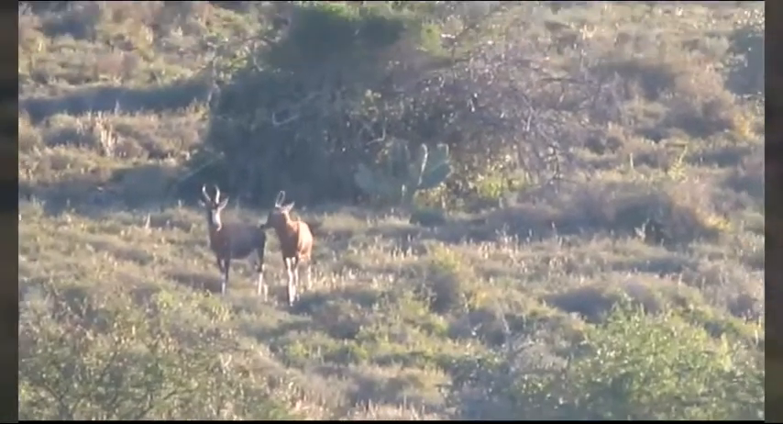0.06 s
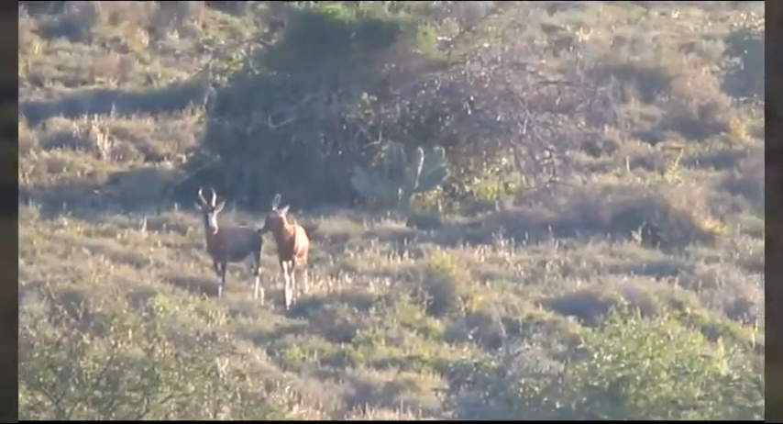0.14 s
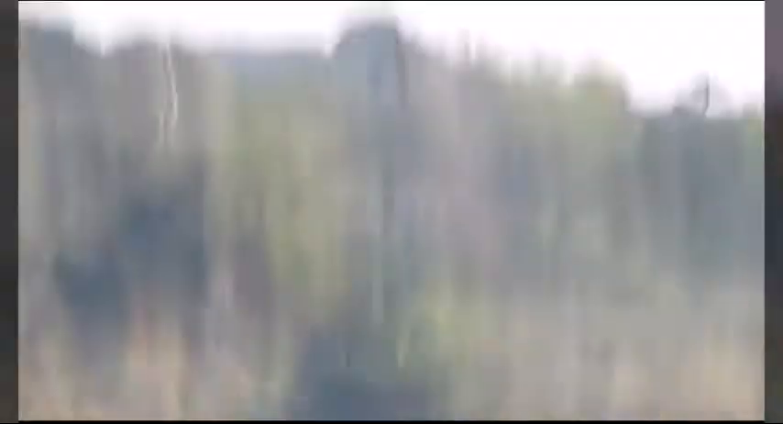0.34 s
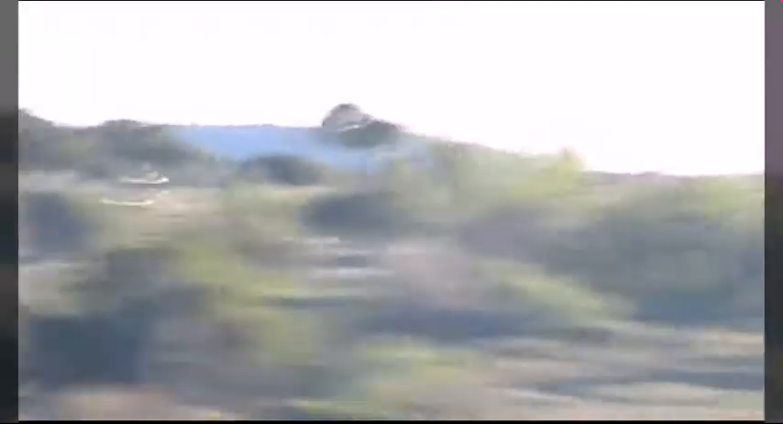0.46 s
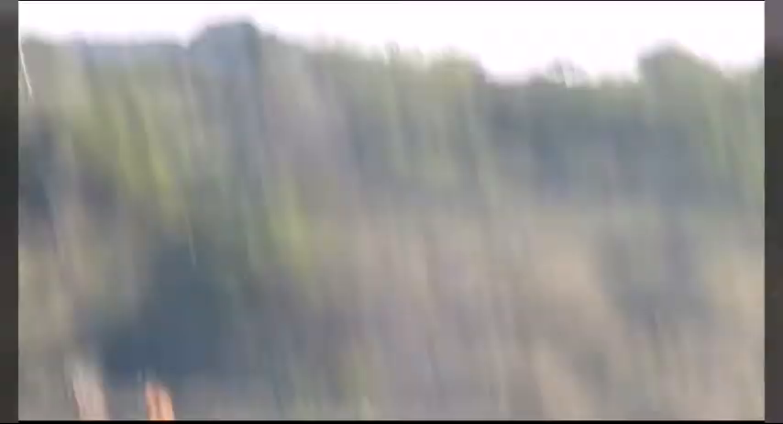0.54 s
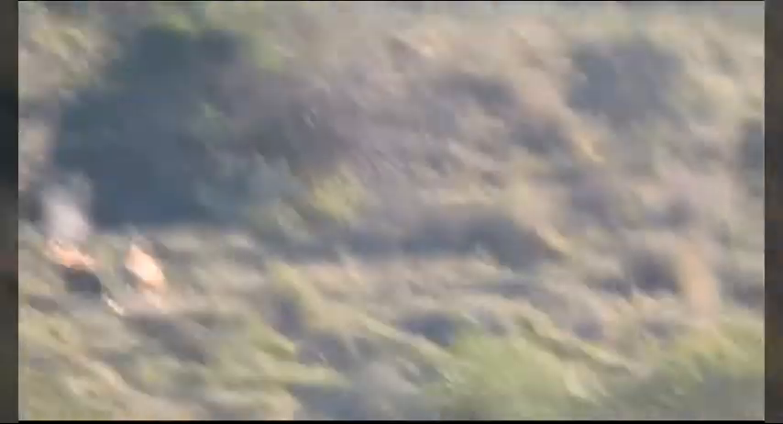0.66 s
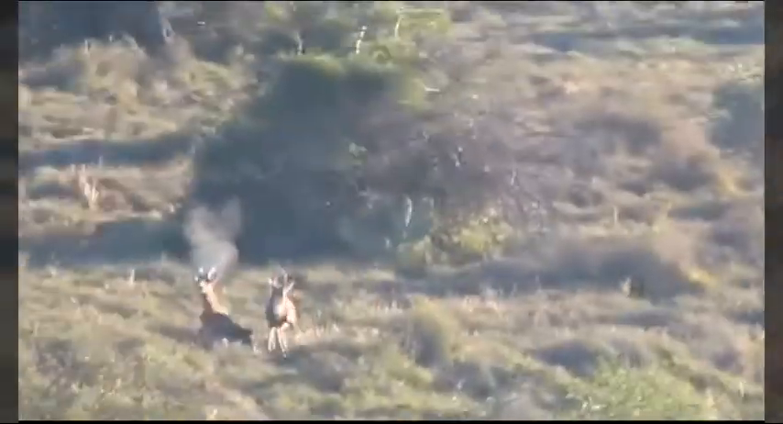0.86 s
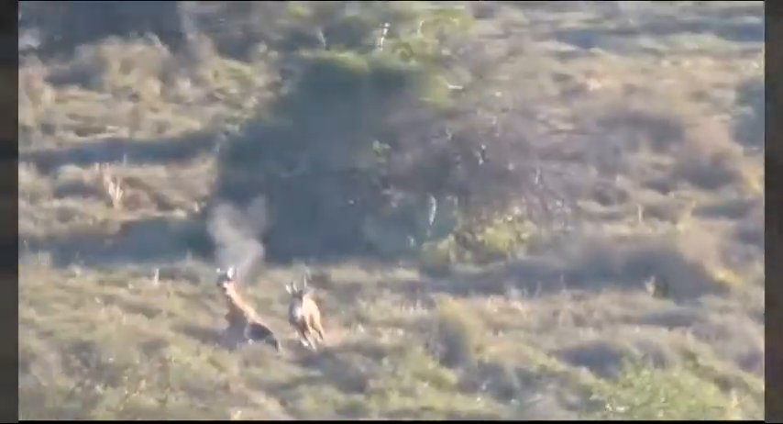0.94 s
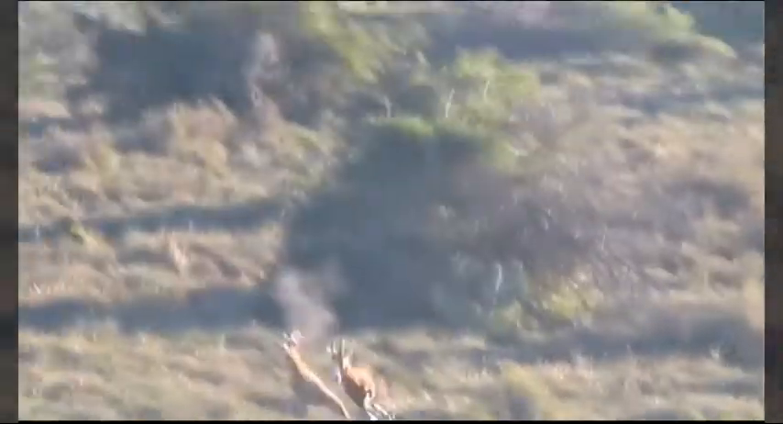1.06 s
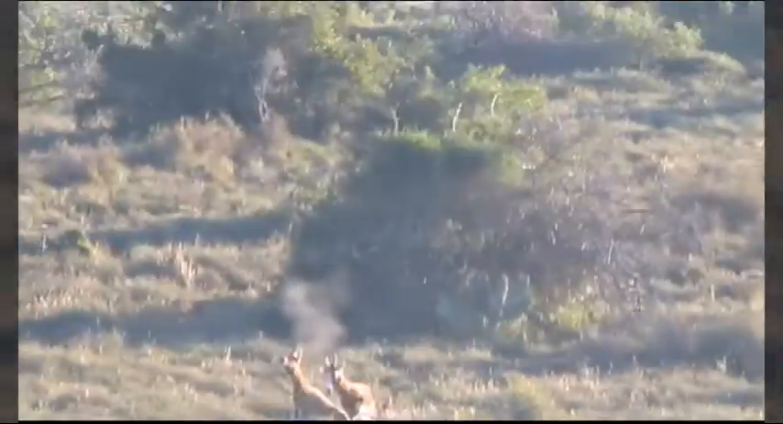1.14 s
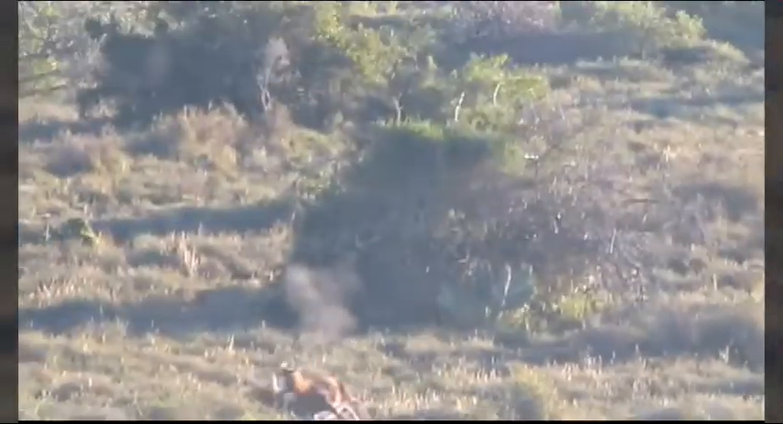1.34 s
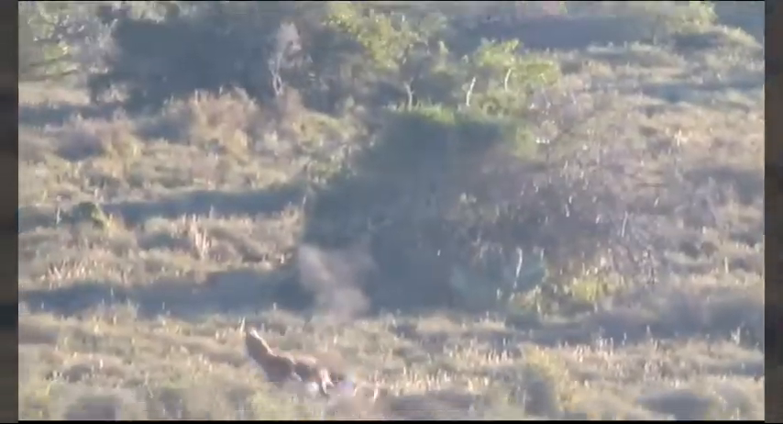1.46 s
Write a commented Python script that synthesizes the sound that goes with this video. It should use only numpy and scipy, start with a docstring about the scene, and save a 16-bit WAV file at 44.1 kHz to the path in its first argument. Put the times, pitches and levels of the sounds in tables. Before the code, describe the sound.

After a brief moment of faint breeze, a close rifle blast bursts out, crackles back from bushes and rumbles into the distance; almost a second later comes a short thudding smack, with dull fluttering echoes after it.

```python
"""Open bush country: a rifle fires beside a camera, a sharp noise front, pressure push and deep swing.
Noise dying by frequency is the scatter of the near scrub; short noise bursts are single bushes.
A sinking hiss and low roll come from ever farther away, then a dull return from the far slope.
The hit comes back as damped knocks, slap noise, a thud and a low tail, all over a light breeze.
The camera's gain control ducks under the shot and recovers slowly."""
import sys
import numpy as np
from scipy import signal
from scipy.fft import rfft, irfft, next_fast_len
from scipy.io import wavfile
from scipy.ndimage import map_coordinates

SR = 44100
rng = np.random.default_rng(int(sys.argv[2]) if len(sys.argv) > 2 else 0)


def wrap_up_sound(samples):
    """Save the sound to the file named by the first command line argument, as 16-bit audio."""
    columns = np.atleast_2d(samples).T
    # keep every value between -1 and 1, then stretch to whole-number steps
    tamed = np.clip(columns, -1, 1)
    steps = np.round(tamed * 32767).astype(np.int16)
    wavfile.write(sys.argv[1], SR, steps)


N = 66150
SHOT_S = 0.2445


def amp(db):
    """Amplitude factor of a level in dB."""
    return 10 ** (np.asarray(db) / 20)


def unit(x):
    """x scaled to rms 1 over all channels."""
    return x / np.sqrt(np.mean(x ** 2) + 1e-20)


def since(start_s):
    """Seconds since start_s for every sample."""
    return np.arange(N) / SR - start_s


def along(points, hz):
    """Value at hz, interpolated on a log frequency axis."""
    point_hz, value = np.transpose(points)
    return np.interp(np.log(hz + 1), np.log(point_hz + 1), value)


def level(points):
    """Gain along (time [s], level [dB]) points."""
    return amp(np.interp(since(0), *np.transpose(points)))


def wobble(rate):
    """Smooth random curve, rate knots per second."""
    knots = rng.standard_normal(4096)
    return map_coordinates(knots, [np.arange(N) * rate / SR], mode="wrap")


def filtered(x, response):
    """x through a fixed frequency response."""
    size = next_fast_len(N + 8192)
    hz = np.fft.rfftfreq(size, 1 / SR)
    return irfft(rfft(x, size) * response(hz), size)[..., :N]


def shaped(x, gain_db, size):
    """x under a gain that depends on frequency and time."""
    hz, t, bins = signal.stft(x, SR, nperseg=size)
    bins = bins * amp(gain_db(hz[:, None], t))
    return signal.istft(bins, SR, nperseg=size)[1][:, :N]


def noise(spectrum):
    """Two unrelated coloured noises, joint rms 1."""
    return unit(filtered(rng.standard_normal((2, N)), lambda hz: amp(along(spectrum, hz))))


def sinking(spectrum, octaves_per_s):
    """Noise whose spectrum slides down as the path over grass and through air grows."""
    def slide_db(hz, t):
        return along(spectrum, hz * 2 ** (octaves_per_s * (t - SHOT_S)))
    return unit(shaped(rng.standard_normal((2, N)), slide_db, size=1024))


def spread(pair, side_db):
    """Left and right from a middle signal and a side signal at side_db."""
    mid, side = pair[0], pair[1] * amp(side_db)
    return np.array([mid + side, mid - side]) / np.sqrt(1 + amp(2 * side_db))


def swing(center_s, hz, spread_s):
    """Swing of air pressure: a sine under a Gaussian centred on center_s."""
    t = since(center_s)
    return -np.sin(2 * np.pi * hz * t) * np.exp(-(t / spread_s) ** 2)


def swell(center_s, db, half_s, pan_db):
    """Left and right gain of one short echo, 4.3 dB down at half_s from its centre."""
    side_gains = amp([[db + pan_db / 2], [db - pan_db / 2]])
    return side_gains * np.exp(-np.abs(since(center_s) / half_s) ** 3 / 2)


AIR_DB = -50.5
# Breeze and microphone hiss: (frequency [Hz], relative density [dB per Hz])
AIR_SPECTRUM = [(20, 2), (45, -9.5), (100, -5), (200, -14), (400, -17.5), (950, -13.5), (1500, -27),
                (3000, -29.5), (8000, -34), (14000, -39.5)]


def air():
    """Light breeze over microphone hiss: coloured noise with a slow level wobble."""
    return spread(noise(AIR_SPECTRUM), side_db=-1.5) * amp(AIR_DB + 0.58 * wobble(rate=7))


# Far slope spectrum: (frequency [Hz], relative density [dB per Hz])
FAR_SPECTRUM = [(100, -15), (200, -6.5), (400, -10), (650, -15.5), (1000, -12.5), (1500, -1.5), (2300, 3),
                (3100, -1), (4300, -18), (6000, -19.5), (8000, -46.5), (11000, -79)]
# Dull return from the far slope: (time [s], level [dB])
FAR_LEVEL = [(.7, -57), (.95, -31), (1.15, -32), (1.22, -29), (1.3, -30.5), (1.395, -31.5), (1.5, -34)]
# Stronger returns: (time [s], level [dB], half length [s], left-right difference [dB])
FAR_RETURNS = [(1.181, -15, 0.0035, -1), (1.19, -21, 0.0042, 1), (1.205, -35, 0.0016, -2),
               (1.234, -24.5, 0.0062, 0), (1.265, -26.5, 0.004, 1), (1.301, -25.5, 0.0057, -1),
               (1.335, -25.5, 0.013, -0.5), (1.431, -28, 0.0088, -1), (1.477, -28, 0.0026, -0.5)]


def far_slope():
    """Dull, fluttering return of the blast; base and stronger returns add in power."""
    power = level(FAR_LEVEL) ** 2 + sum(swell(*row) ** 2 for row in FAR_RETURNS)
    flutter = amp(1.2 * wobble(rate=340))
    return spread(noise(FAR_SPECTRUM), side_db=-8.5) * flutter * np.sqrt(power) * (since(SHOT_S) >= 0)


ROLL_AT_100_MS_DB, ROLL_LOSS_DB_PER_DECADE = -19, 20  # loss per tenfold path
ROLL_SINK_OCT_PER_S, ROLL_FLUTTER_DB = 1.5, 2
# Low roll at the shot: (frequency [Hz], relative density [dB per Hz])
ROLL_SPECTRUM = [(30, -31), (110, -19.5), (210, 0.5), (330, 0), (540, -3.5), (780, -10), (1200, -26),
                 (3000, -56.5)]


def roll():
    """Bass of the report rolling on over the ground, weaker and deeper with the path."""
    t = since(SHOT_S)
    level_db = ROLL_AT_100_MS_DB - ROLL_LOSS_DB_PER_DECADE * np.log10(np.maximum(10 * t, 0.5))
    level_db = level_db + ROLL_FLUTTER_DB * wobble(rate=38)
    return spread(sinking(ROLL_SPECTRUM, ROLL_SINK_OCT_PER_S), side_db=-17) * amp(level_db) * (t >= 0)


TWIG_SIDE_DB, TWIG_NARROWS_DB_PER_S, TWIG_ROUGH_DB = -1, 10, 1.5


def twigs(pair):
    """Crackling scatter from many twigs, narrower as it comes from farther ahead."""
    side_db = TWIG_SIDE_DB - TWIG_NARROWS_DB_PER_S * since(SHOT_S)
    return unit(spread(pair, side_db) * amp(TWIG_ROUGH_DB * wobble(rate=450)))


HISS_SINK_OCT_PER_S, HISS_FLUTTER_DB = 0.62, 1.24
# Hiss at the shot: (frequency [Hz], relative density [dB per Hz])
HISS_SPECTRUM = [(500, -57.5), (1100, -26.5), (1700, -13.5), (2400, -5.5), (3500, 1), (4800, 0),
                 (6600, -5.5), (8800, -15), (11500, -21), (14500, -67)]
# Rolling hiss between the bushes: (time [s], level [dB])
HISS_LEVEL = [(.26, 4.5), (.39, -14.5), (.45, -18), (.515, -23), (.6, -19), (.69, -22), (.745, -16.5),
              (.9, -18.5), (1.0, -21), (1.155, -15), (1.211, -29.5), (1.5, -52)]


def hiss():
    """The crack comes back as a rolling hiss that dulls with distance."""
    scatter = twigs(sinking(HISS_SPECTRUM, HISS_SINK_OCT_PER_S))
    flutter = amp(HISS_FLUTTER_DB * wobble(rate=110))
    return scatter * level(HISS_LEVEL) * flutter * (since(SHOT_S) >= 0)


# Bush echo before its octave shift: (frequency [Hz], relative density [dB per Hz])
BUSH_SPECTRUM = [(500, -40), (1100, -22), (1700, -7.5), (2500, -1.5), (3600, 2), (5200, -0.5), (6800, -9),
                 (8800, -17.5), (11000, -27.5), (14000, -67.5)]
# Single bushes: (time [s], level [dB], half length [s], left-right difference [dB], shift [octaves])
BUSH_ECHOES = [(0.298, 11, 0.0052, 4.5, 0.22), (0.332, 6, 0.0043, 5.5, 0.015),
               (0.359, -1, 0.0042, -1.5, -0.2), (.386, -7.5, 0.0052, -2, -0.08),
               (.433, -11, 0.0045, 8, -.3), (0.47, -11, 0.0079, -3.5, 0), (.489, -11, 0.005, 1, 0.28),
               (0.547, -10, 0.0066, -3.5, 0.0059), (0.571, -14.5, 0.0076, -3, 0.014),
               (0.798, -18, 0.0049, 0, -0.1), (.843, -15.5, 0.0056, 2, -0.25),
               (.869, -15, 0.0055, 1.5, -0.14), (0.914, -14.5, 0.011, 0.5, -0.19),
               (0.976, -14, 0.0035, 0, -0.32), (1.024, -14, 0.0022, -1, -0.34),
               (1.1, -20, 0.0019, 5, -0.33), (1.12, -20.5, 0.0045, 0, -0.32)]


def bushes():
    """Each big bush throws the crack back as a short noise burst of its own brightness."""
    out = np.zeros((2, N))
    for time_s, db, half_s, pan_db, octaves in BUSH_ECHOES:
        colour = [(hz * 2 ** octaves, band_db) for hz, band_db in BUSH_SPECTRUM]
        out = out + twigs(noise(colour)) * swell(time_s, db, half_s, pan_db)
    return out


HIT_S, HIT_AIR_HZ = 1.16, 5300  # the long path takes the treble
# Ring of the strike: (frequency [Hz], level [dB], T60 [s])
KNOCK_MODES = [(313, -13.5, 0.029), (966, -14, 0.015), (1630, 4, 0.0059), (4240, -2, .005)]
SLAP_DB, SLAP_T60_S = -11, 0.022
# Slap: (frequency [Hz], relative density [dB per Hz])
SLAP_SPECTRUM = [(200, -20), (600, -20), (1000, -6), (1700, 8), (2600, 8), (5000, -20), (8000, -19),
                 (12000, -40)]
THUD_DELAY_S, THUD_DB, THUD_HZ, THUD_SPREAD_S = 0.00449, 1, 155.4, 0.0035
HIT_TAIL_DB, HIT_TAIL_T60_S = -16.5, 0.11
# Low tail: (frequency [Hz], relative density [dB per Hz])
HIT_TAIL_SPECTRUM = [(30, -3), (90, -6), (200, -8), (400, -15), (1000, -48), (4000, -52)]


def hit():
    """Bullet strike: damped cosines, decaying slap noise, a thud swing and a short low tail."""
    t = since(HIT_S)
    age_s = np.maximum(t, 0)
    knock = np.zeros(N)
    for hz, db, t60_s in KNOCK_MODES:
        knock = knock - np.cos(2 * np.pi * hz * age_s) * amp(db - 60 * age_s / t60_s)
    slap = spread(noise(SLAP_SPECTRUM), side_db=-6) * amp(SLAP_DB - 60 * age_s / SLAP_T60_S)
    thud = amp(THUD_DB) * swing(HIT_S + THUD_DELAY_S, THUD_HZ, THUD_SPREAD_S)
    tail = spread(noise(HIT_TAIL_SPECTRUM), side_db=-23)
    tail = tail * amp(HIT_TAIL_DB - 60 * age_s / HIT_TAIL_T60_S)
    strike = (knock + slap + thud + tail) * (t >= 0)
    return filtered(strike, lambda hz: np.exp(-(hz / HIT_AIR_HZ) ** 4))


SCRUB_DB, SCRUB_HOLD_S, SCRUB_SAG_DB_PER_S, SCRUB_ROUGH_DB = 16.5, 0.034, 77, 0.86
# Near scrub, also colours the front: (frequency [Hz], relative density [dB per Hz])
SCRUB_SPECTRUM = [(20, 0), (70, 4.5), (170, -3), (330, 0.5), (510, 5.5), (800, 3), (1000, 4), (1400, -3.5),
                  (2100, 3.5), (3200, -3.5), (5000, 1), (7000, 0.5), (10000, -2), (14000, -8),
                  (16000, -23.5)]
# Scrub decay after the hold: (frequency [Hz], T60 [s])
SCRUB_T60 = [(50, 0.092), (130, .13), (280, 0.3), (500, 0.27), (1100, 0.18), (3000, 0.21), (7000, 0.24),
             (14000, 0.19)]
# Left-right likeness: (frequency [Hz], correlation [-1..1])
SCRUB_ALIKE = [(60, -.1), (140, 0.5), (300, .65), (700, 0.91), (1500, 0.65), (3000, 0.15), (14000, 0.16)]


def scrub():
    """Dense scatter from the near scrub: holds with a slight sag, then dies at a rate per frequency."""
    def mid_side(hz):
        angle = np.arccos(np.clip(along(SCRUB_ALIKE, hz), -1, 1)) / 2
        return np.array([np.cos(angle), np.sin(angle)])

    def dying_db(hz, t):
        return -60 * np.maximum(t - SHOT_S - SCRUB_HOLD_S, 0) / along(SCRUB_T60, hz)

    t = since(SHOT_S)
    mid, side = filtered(noise(SCRUB_SPECTRUM), mid_side)
    scatter = shaped(unit(np.array([mid + side, mid - side])), dying_db, size=256)
    sag_db = SCRUB_SAG_DB_PER_S * np.clip(t, 0, SCRUB_HOLD_S)
    return scatter * amp(SCRUB_DB + SCRUB_ROUGH_DB * wobble(rate=420) - sag_db) * (t >= 0)


BOOM_S, BOOM_DB, BOOM_HZ, BOOM_SPREAD_S = 0.255, 2.5, 41.7, 0.009


def boom():
    """Deep swing of the muzzle blast, cut off before the shot."""
    return -amp(BOOM_DB) * swing(BOOM_S, BOOM_HZ, BOOM_SPREAD_S) * (since(SHOT_S) >= 0)


CRACK_DB, CRACK_HOLD_S, CRACK_FALL_DB_PER_S = 20, 0.0012, 5996.5
PUSH_DB, PUSH_S = 15, 0.0025


def muzzle_blast():
    """Sharp noise front plus a pressure push that reverses sign after PUSH_S."""
    t = since(SHOT_S)
    age_s = np.maximum(t, 0)
    fall_db = CRACK_FALL_DB_PER_S * np.maximum(t - CRACK_HOLD_S, 0)
    front = noise(SCRUB_SPECTRUM) * amp(CRACK_DB - fall_db)
    push = -amp(PUSH_DB) * (1 - age_s / PUSH_S) * np.exp(-age_s / PUSH_S)
    return (front + push) * (t >= 0)


def scene():
    """Everything that reaches the camera."""
    background = air() + far_slope() + roll()
    echoes = hiss() + bushes()
    return background + echoes + hit() + scrub() + boom() + muzzle_blast()


GAIN_LIMIT_DB, GAIN_ATTACK_S, GAIN_RECOVERY_DB_PER_S = -11, 0.007, 11.5
TOP_HZ = 15400
# Left microphone against right, half applied to each: (frequency [Hz], difference [dB])
MIC_DIFFERENCE = [(60, 0), (300, -0.5), (700, 1.5), (1600, -1.5), (3000, -1.5), (5500, 4.5), (8000, 2),
                  (12000, -1)]


def record(dry):
    """Gain control ducking fast and recovering slowly, unequal microphones, clipping, band limit."""
    keep = np.exp(-1 / (GAIN_ATTACK_S * SR))
    power = signal.lfilter([1 - keep], [1, -keep], np.mean(dry ** 2, axis=0))
    over_db = np.maximum(10 * np.log10(np.abs(power) + 1e-12) - GAIN_LIMIT_DB, 0)
    # running maximum along a ramp: the duck falls back at a constant dB rate
    recovery_db = GAIN_RECOVERY_DB_PER_S * since(0)
    duck_db = np.maximum.accumulate(over_db + recovery_db) - recovery_db
    halves = np.array([[0.5], [-0.5]])
    heard = filtered(dry * amp(-duck_db), lambda hz: amp(along(MIC_DIFFERENCE, hz) * halves))
    return filtered(np.clip(heard, -1, 1), lambda hz: 1 / np.sqrt(1 + (hz / TOP_HZ) ** 100))


dry = scene()
out = record(dry)
wrap_up_sound(out)
```